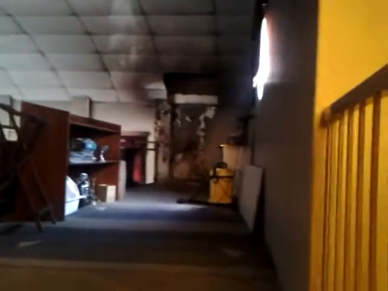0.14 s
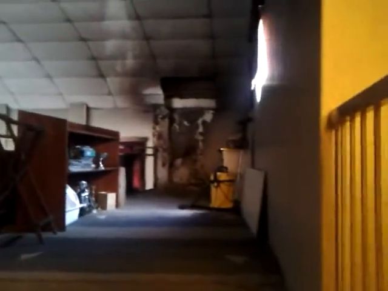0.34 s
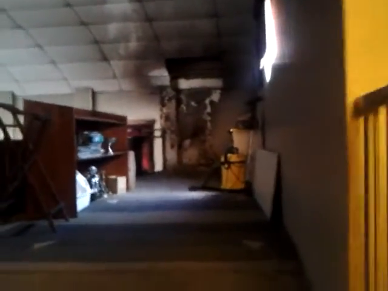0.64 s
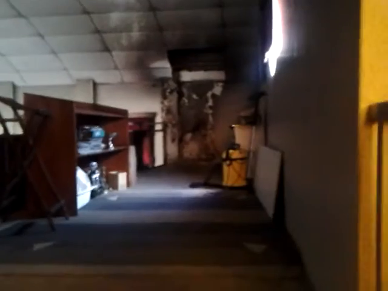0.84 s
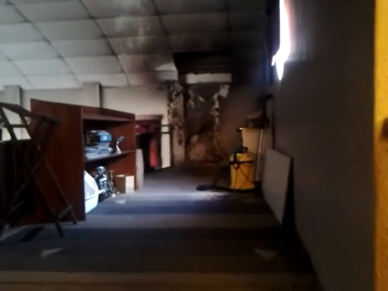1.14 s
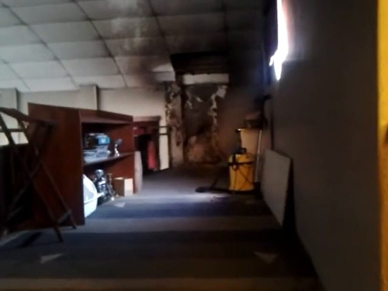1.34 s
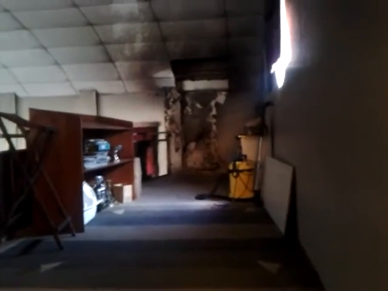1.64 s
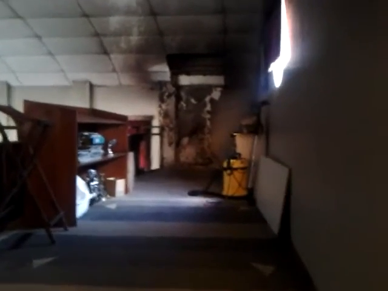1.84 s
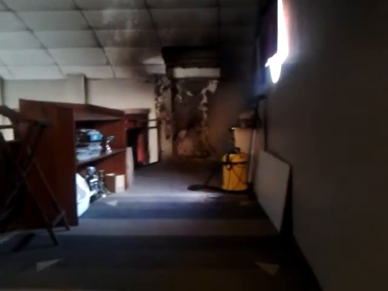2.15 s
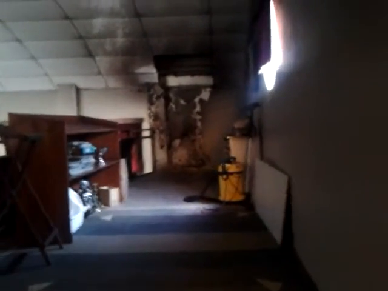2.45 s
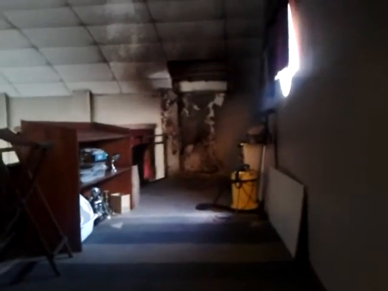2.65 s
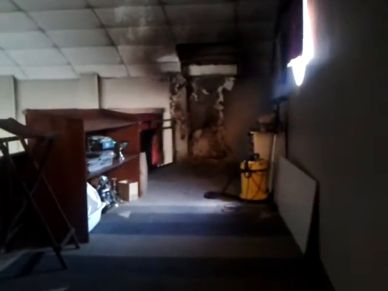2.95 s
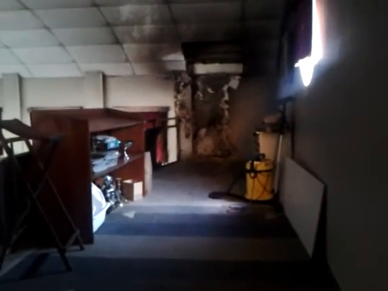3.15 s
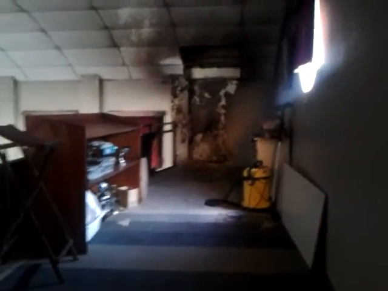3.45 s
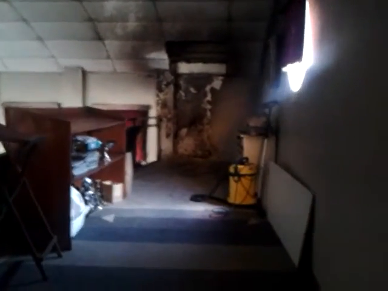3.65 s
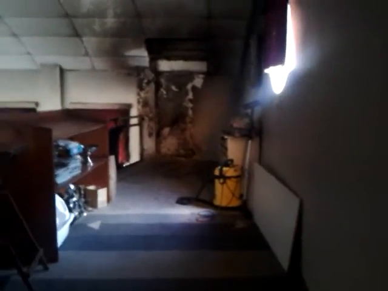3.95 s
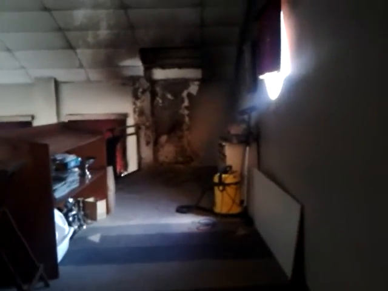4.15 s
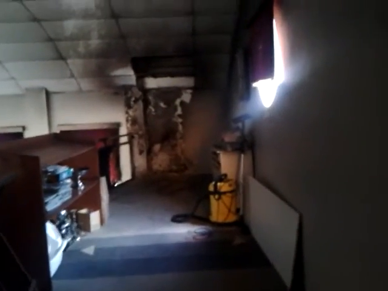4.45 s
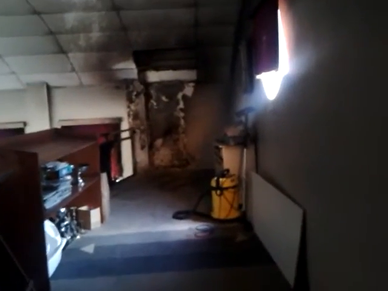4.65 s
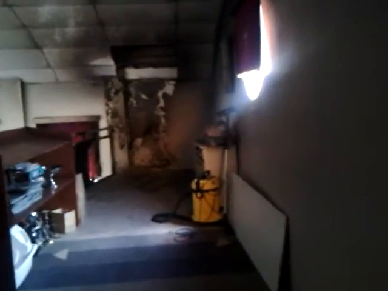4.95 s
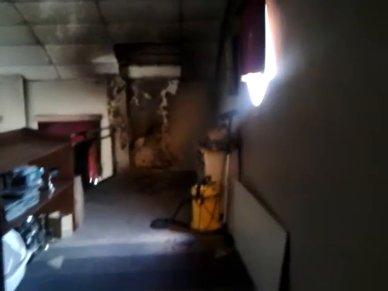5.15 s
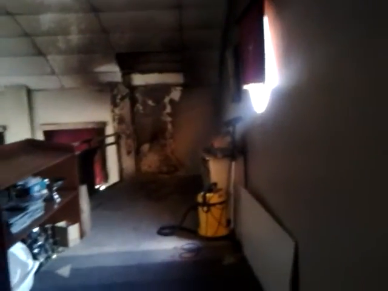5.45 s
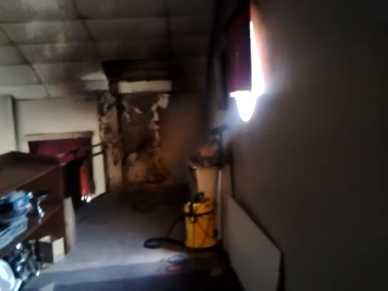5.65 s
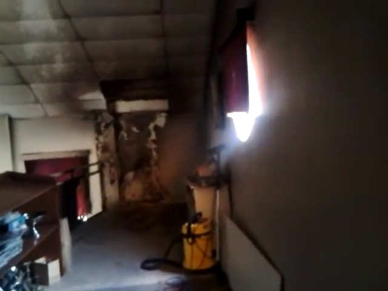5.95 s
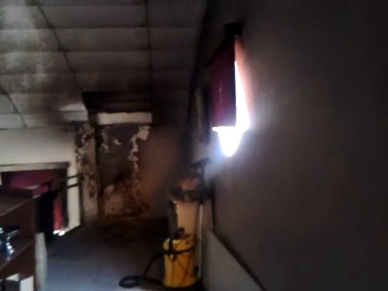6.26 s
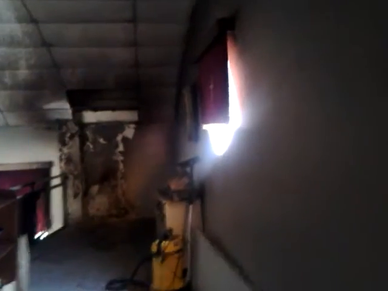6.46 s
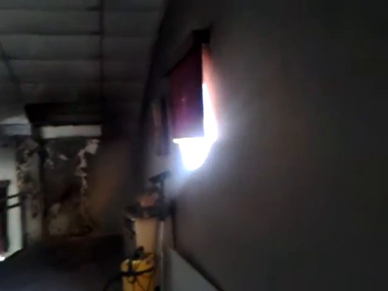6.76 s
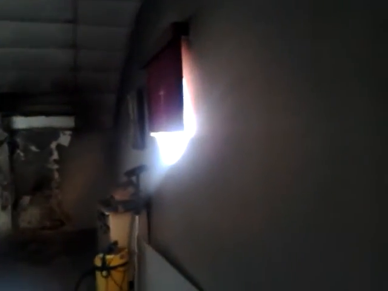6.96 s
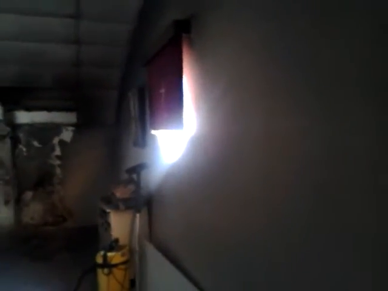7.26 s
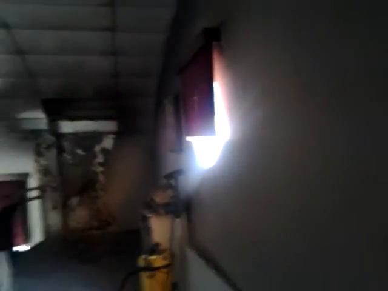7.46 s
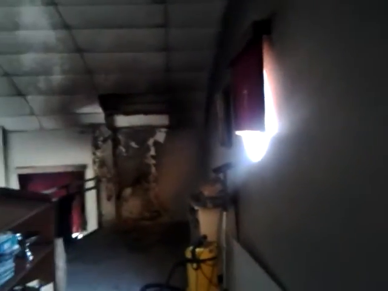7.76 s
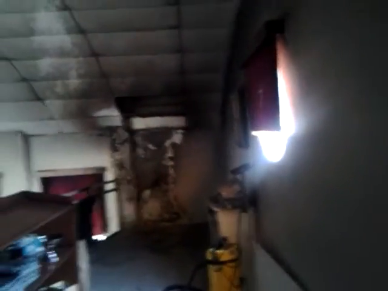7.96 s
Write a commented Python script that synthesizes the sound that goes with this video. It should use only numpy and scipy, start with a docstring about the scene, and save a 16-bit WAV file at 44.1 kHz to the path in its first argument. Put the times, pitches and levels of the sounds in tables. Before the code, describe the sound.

Someone slowly climbs wooden stairs in an echoing room, each step knocking and ringing, while soles scuff and clothing rustles softly.

```python
"""Last wooden stairs, quiet hall

Someone slowly climbs the last wooden stairs into a quiet hall, carrying the microphone on a camera.
Footfalls are coloured noise that cracks and fills the hall, with ringing modes of board and staircase.
Soles scuff and creak between steps; clothes rustle as shaped noise, over faint hiss and a far rumble.
A few small ticks of grit follow after the last step. One channel."""
import sys
import numpy as np
from scipy import signal
from scipy.fft import rfft, irfft, next_fast_len
from scipy.io import wavfile
from scipy.ndimage import uniform_filter1d

SR = 44100
rng = np.random.default_rng(int(sys.argv[2]) if len(sys.argv) > 2 else 0)


def log_audio(samples):
    """Write samples as a 16-bit WAV file to the path given in sys.argv[1]."""
    # one column per channel
    frames = np.atleast_2d(samples).T
    # limit to full scale, then quantise
    limited = np.clip(frames, -1, 1)
    pcm = np.round(limited * 32767).astype(np.int16)
    wavfile.write(sys.argv[1], SR, pcm)


N = 357634
TIME = np.arange(N) / SR  # seconds through the whole scene
AGE = np.arange(2 * SR) / SR  # seconds since the onset of one sound

# All levels are those ahead of the microphone.
# Footfalls on the stairs: start_s, level_db, bass_db, treble_db, knock_db, knock_pitch_hz,
# crack_db and staircase_db (both relative to level_db), with swell_s between those two
FOOTFALLS = [(.284, -34, 0, -10, 10, 2100, -4, 0.0017, -20),
             (0.3303, -30.5, -4, 0.5, -4.5, 2100, 6, 0.0011, -28),
             (1.533, -43, -1.5, -8, 4.5, 3760, -8, .007, -26),
             (2.468, -36.5, -7, -0.5, 4, 1600, 4, 0.0038, -15),
             (3.4301, -31, -6, -0.5, 7.5, 3970, 1.5, 0.016, -26),
             (4.396, -26, -12, 8.5, -2, 2600, -3, 0.0045, -12),
             (4.413, -25.5, -8.5, 1.5, 0.5, 2500, -4, 0.0041, -2.5),
             (5.622, -32.5, -6.5, -3, -5, 1950, -8.5, 0.0046, -16),
             (5.6667, -19.5, 0.5, -3.5, 7, 2900, 4.5, 0.0036, 1.5),
             (5.6904, -24.5, -4, -6, 3, 2380, 12.5, 0.0018, -27)]
# Every trodden spot has its own voice: start_s, level_db, drop_db from one pitch to the next,
# then seven columns of pitch_hz
TREAD_VOICES = [(0.2845, -39, 1.5, 1780, 974, 2230, 1900, 780, 445, 2450),
                (0.331, -35, 1.3, 626, 674, 445, 776, 1089, 347, 1271),
                (1.534, -47, 2, 479, 823, 1299, 335, 747, 852, 710),
                (2.469, -37, 1.3, 323, 459, 716, 775, 835, 576, 415),
                (3.432, -37.5, 1.7, 567, 615, 429, 1122, 955, 2080, 1203),
                (4.413, -32, .8, 725, 967, 472, 579, 852, 792, 1157)]
# Modes of the whole staircase: pitch_hz, level_db, t60_s
STAIRCASE_MODES = [(199, -26, 1.4), (267, -16, .9), (420, -2, .85), (451, -8, .85), (494, -5, .8),
                   (592, -6, .9), (790, -12, .7), (834, -10, .65), (942, -10, .75), (1100, -4, .75),
                   (1845, -11, .7), (2062, -12, .7), (2116, -12, .7), (2342, -11, .7), (2757, -12, .6)]
# The handrail hums after a firm step: start_s, pitch_hz, level_db, t60_s
HANDRAIL_HUMS = [(.332, 205, -45, .8), (2.469, 200, -58, .8), (3.432, 200, -62, 1), (4.42, 204.4, -54.5, 4),
                 (4.42, 161, -60, 2)]
# Soles slapping and scuffing: start_s, level_db, body_db, top_db, swell_s
SOLE_SCUFFS = [(0.5862, -43, -3.5, 1, 0.0019), (.6125, -54, 8, 3, 0.0014), (1.41, -67, 17, -14, .022),
               (1.844, -60, 14, -7, 0.003), (2.704, -43, 1.5, 0, 0.0045), (2.7468, -55, 14, -13, 0.00046),
               (3.8258, -35, 0, -15, 0.014), (3.8553, -32.5, 1, -11, 0.0076), (3.873, -36, -6, -10, 0.0035),
               (4.3921, -31, -4.5, -1, .011), (4.9748, -48, 1, -6, 0.0029), (4.9892, -49, -1, 1, .004),
               (6.35, -53.5, -1, -0.5, 0.021), (7.19, -56, -6, 2, .038)]
# Small ticks of grit underfoot: start_s, level_db, brightness_db
GRIT_TICKS = [(6.748, -59, -12), (6.9037, -57.5, -1), (7.154, -66.5, 6), (7.5532, -58.5, -1),
              (7.722, -56, -1.5)]
# Shoe creaks: loudest_s, level_db, half_length_s, strongest_pitch_hz
SHOE_CREAKS = [(1.858, -50.5, 0.0055, 9050), (1.916, -48, 0.015, 9000), (1.94, -50.5, 0.012, 7700),
               (2.007, -46.5, .004, 8500), (2.168, -58, 0.0071, 6300), (3.776, -47.5, 0.0062, 11200),
               (3.794, -50, .006, 8900), (4.838, -55, 0.0023, 7200), (7.635, -58, 0.0025, 8500)]
# Resonances of the shoe: pitch_hz, width_hz, level_db
SHOE_RESONANCES = [(6160, 900, -7.5), (7180, 400, -8), (10400, 540, -3), (13900, 1200, -10)]
# Sleeves and trouser legs sliding past each other: loudest_s, level_db, half_length_s
FABRIC_SWISHES = [(.06, -58.5, 0.11), (2.35, -64, 0.18), (2.67, -57, 0.057), (3, -62.5, 0.073),
                  (3.23, -63.5, 0.088), (4.98, -64.5, 0.057), (5.18, -60.5, 0.12), (5.47, -58.5, .07),
                  (8.06, -64, 0.17)]
# Rustle of heavy folds, mostly louder while walking: time_s, level_db
RUSTLE_LEVEL = [(0, -56), (.6, -60), (1.3, -58.5), (2.3, -62), (3, -59), (3.4, -65), (3.75, -54.5),
                (4.35, -65), (5.1, -59), (5.55, -64), (6.25, -63.5), (6.9, -66), (7.7, -75.5), (8.1, -65.5)]
# The far rumble, swelling in the last two seconds: time_s, level_db
RUMBLE_LEVEL = [(0, -86), (6.2, -82), (6.8, -71), (7.2, -72.5), (7.7, -72.5), (8.1, -78)]
# Spectra of struck wood, sole, heavy folds, sliding fabric, faint hiss and far rumble:
# pitch_hz, density_db (per Hz, relative)
WOOD_SPECTRUM = [(30, -40), (70, -42), (130, -29.5), (245, -14), (320, -7), (430, -3.5), (750, -0.5),
                 (1350, -4), (2200, -2), (3200, -12.5), (4200, -17.5), (8500, -20), (11000, -27),
                 (16000, -33.5)]
SOLE_SPECTRUM = [(60, -32), (250, -15), (600, -3.5), (1200, 0), (2200, 6), (3600, 0.5), (6500, 0),
                 (9500, 2.5), (12000, -5), (16000, -5)]
FOLD_SPECTRUM = [(60, -18.5), (250, -3.5), (700, 4), (1400, 3.5), (2200, 5), (3300, -3.5), (5500, -9),
                 (9000, -6), (16000, -5.5)]
SWISH_SPECTRUM = [(2000, -11.5), (6000, -8), (7200, -7), (8100, -2), (9000, -3.5), (11000, -17),
                  (16000, -14.5)]
AIR_SPECTRUM = [(25, -27.5), (50, -20.5), (100, -12), (230, 1.5), (400, 2), (650, -5), (1500, -7),
                (2200, -8.5), (3300, -10.5), (6000, -13), (8500, -21.5), (12000, -9), (16000, -7.5)]
RUMBLE_SPECTRUM = [(25, -16.5), (60, -12), (100, 2.5), (180, 0), (400, -14), (1000, -38.5), (4000, -69)]
# The hall by frequency band: centre_hz, t60_s, build_up_s
HALL_BANDS = [(120.1, 2.3, 0.071), (400, 1.23, 0.0047), (940, 0.91, 0.0045), (2250, 0.75, 0.00099),
              (4500, 0.64, .001), (8500, 0.53, .001), (15100, .38, .001)]

# The harder the blow, the shorter the contact: contact time at a reference level, and exponent
CONTACT_S, CONTACT_AT_DB, CONTACT_SHORTENING = 0.0026, -29, 0.81
# Corners of the tone of a blow; its top follows the treble
BASS_HZ, BODY_HZ, TREBLE_HZ, TOP_HZ = 300, 1000, 7500, 12500
TOP_DB, TOP_FOLLOWS = 1, 1.3
KNOCK_OCTAVES = 0.56  # spread of the band in which the heel knocks, or is muffled
# Low pitches of a board ring longer: t60 at a reference pitch, and exponent
TREAD_T60_S, TREAD_AT_HZ, TREAD_DAMPING = 0.8, 553, 0.12
SLAP_DB, SLAP_LOSS_DB_PER_S = 14.5, 1300  # a quick slap cracks, a slow scuff does not
SLIDE_DB = -12.5  # faint sliding that goes with any rustle
EDGE_HZ = 15850  # upper band limit of the microphone channel


def footfalls():
    """Each blow of the shoe has its own tone and shakes the staircase; harder blows crack more briefly."""
    out = np.zeros(N)
    for s, db, bass, treble, knock, knock_hz, crack, swell, shake in FOOTFALLS:
        tone = shoe_tone(bass, treble, knock, knock_hz)
        contact_s = CONTACT_S * amp(CONTACT_AT_DB - db) ** CONTACT_SHORTENING
        impact = blow(WOOD_SPECTRUM, tone, crack, swell, crack_s=contact_s, patchy_db=3.0)
        staircase = sum(ring(hz, mode_db + shake, t60) for hz, mode_db, t60 in STAIRCASE_MODES)
        add(out, s, amp(db) * (impact + staircase))
    return out


def treads():
    """The trodden board rings at its own pitches; a firm step sets the handrail humming."""
    out = np.zeros(N)
    for s, db, drop, *pitches in TREAD_VOICES:
        for k, hz in enumerate(pitches):
            t60 = TREAD_T60_S * (TREAD_AT_HZ / hz) ** TREAD_DAMPING
            add(out, s, ring(hz, db - k * drop, t60))
    for s, *hum in HANDRAIL_HUMS:
        add(out, s, ring(*hum))
    return out


def scuffs():
    """Bright slaps and slower scuffs of the sole in the hall, and tiny dry ticks of grit."""
    out = np.zeros(N)
    for s, db, body, top, swell in SOLE_SCUFFS:
        tone = [(2200, body), (4500, 0), (8500, 0), (12500, top)]
        crack = SLAP_DB - SLAP_LOSS_DB_PER_S * swell
        add(out, s, amp(db) * blow(SOLE_SPECTRUM, tone, crack, swell, crack_s=0.00083, patchy_db=3.0))
    for s, db, bright in GRIT_TICKS:
        grit = colour(noise(SOLE_SPECTRUM, len(AGE)), [(2000, -bright), (7000, bright)])
        decay = fade(t60=0.0085) + amp(-12.5) * fade(t60=0.34)
        add(out, s, amp(db) * grit * decay)
    return out


def creaks(slips_per_s=900, squeal_width_hz=600, rub_db=-15, wet_db=-3):
    """Rubbing noise, roughened by random quick slips, excites narrow resonances of the shoe."""
    out = np.zeros(N)
    hz = np.fft.rfftfreq(len(AGE), 1 / SR)
    for s, db, half, pitch in SHOE_CREAKS:
        slipping = rng.random(len(AGE)) < slips_per_s / SR
        friction = rng.standard_normal(len(AGE)) * (0.73 + slipping)
        modes = [*SHOE_RESONANCES, (pitch, squeal_width_hz, 0)]
        body = sum(amp(d) / (1 + 2j * (hz - f) / w) for f, w, d in modes)
        rub = amp(rub_db) * hz / (hz + 4000)
        squeal = unit(irfft(rfft(friction) * (body + rub)))
        envelope = np.exp(-(AGE / half - 2) ** 2)  # loudest two half lengths after its onset
        add(out, s - 2 * half, amp(db) * squeal * envelope)
    tail = hall(rng.standard_normal(len(AGE)), swell=0.0063)
    echoes = signal.fftconvolve(out, tail / np.linalg.norm(tail))[:N]
    return out + amp(wet_db) * echoes


def clothes(flutter_db=0.68):
    """Folds rustle unevenly as the body moves; each swish of smooth fabric swells and fades."""
    rustle = amp(np.interp(TIME, *np.transpose(RUSTLE_LEVEL)))
    strokes = sum(amp(db) * np.exp(-.5 * ((TIME - s) / half) ** 2) for s, db, half in FABRIC_SWISHES)
    flutter = amp(flutter_db * unit(uniform_filter1d(rng.standard_normal(N), size=900)))
    folds = noise(FOLD_SPECTRUM, N) * rustle
    swish = noise(SWISH_SPECTRUM, N) * np.hypot(strokes, amp(SLIDE_DB) * rustle)
    return (folds + swish) * flutter


def background(air_db=-64):
    """Steady faint hiss, and a far rumble that swells near the end, both coloured noise."""
    hiss = amp(air_db) * noise(AIR_SPECTRUM, N)
    rumble = noise(RUMBLE_SPECTRUM, N) * amp(np.interp(TIME, *np.transpose(RUMBLE_LEVEL)))
    return hiss + rumble


def blow(spectrum, tone, crack_db, swell, crack_s, patchy_db, ripple_db=7.0, lowest_hz=130):
    """A short direct crack, then reflections that are patchy at first and soon merge."""
    patches = unit(uniform_filter1d(rng.standard_normal(len(AGE)), size=50))
    clumps = amp(patchy_db * patches * np.exp(-AGE / 0.076))
    voice = colour(colour(noise(spectrum, len(AGE)), tone), ripple(ripple_db))
    echoes = hall(voice, swell) * clumps
    # reversed: the crack has the colour of its echoes but not their waveform
    direct = voice[::-1] * np.exp(1 - AGE / crack_s) * AGE / crack_s
    # boards and soles are too small to radiate deep bass
    highpass = signal.butter(4, lowest_hz, "high", fs=SR, output="sos")
    return signal.sosfilt(highpass, echoes + amp(crack_db) * direct)


def shoe_tone(bass_db, treble_db, knock_db, knock_hz):
    """The colour of one blow, dull or bright, with the heel's knock as a hump or hollow: (Hz, dB)."""
    hz = np.geomspace(100, 16000, num=60)
    top_db = TOP_DB + TOP_FOLLOWS * treble_db
    slope = [(BASS_HZ, bass_db), (BODY_HZ, 0), (TREBLE_HZ, treble_db), (TOP_HZ, top_db)]
    knock = knock_db * np.exp(-.5 * (np.log2(hz / knock_hz) / KNOCK_OCTAVES) ** 2)
    return np.c_[hz, read(slope, hz) + knock]


def ripple(depth_db):
    """Crowded small resonances that differ from one blow to the next, of mean power 1: (Hz, dB)."""
    hz = np.geomspace(300, 16000, num=160)
    db = rng.uniform(-depth_db, depth_db, len(hz))
    return np.c_[hz, db - 10 * np.log10(np.mean(amp(db) ** 2))]


def ring(hz, db, t60, swell=0.015):
    """One mode that builds up and dies away, a sine of random phase."""
    envelope = fade(t60) * (1 - np.exp(-AGE / swell))
    return amp(db) * envelope * np.sin(2 * np.pi * (hz * AGE + rng.random()))


def hall(x, swell):
    """Lets a steady sound build up and die away in the hall, the bass more slowly than the treble."""
    hz, spectrum = np.fft.rfftfreq(len(x), 1 / SR), rfft(x)
    centres, t60s, rises = np.transpose(HALL_BANDS)
    out = np.zeros(len(x))
    for row, t60, rise in zip(np.eye(len(HALL_BANDS)), t60s, rises):
        share = read(np.c_[centres, row], hz)  # overlapping bands that add up to the whole
        out += irfft(spectrum * share) * fade(t60) * (1 - np.exp(-AGE / (swell + rise)))
    return out


def fade(t60):
    """Exponential decay by 60 dB in t60 seconds."""
    return np.exp(-np.log(1000) * AGE / t60)


def noise(points, size):
    """Noise of rms 1 with the given spectrum."""
    return unit(colour(rng.standard_normal(size), points))


def colour(x, points):
    """Filters x by a table of (Hz, dB)."""
    size = next_fast_len(len(x))
    gain = amp(read(points, np.fft.rfftfreq(size, 1 / SR)))
    return irfft(rfft(x, size) * gain, size)[:len(x)]


def read(points, hz):
    """A table joined by straight lines over log frequency."""
    f, value = np.transpose(points)
    return np.interp(np.log(hz + 1), np.log(f), value)


def add(mix, s, sound):
    """Mixes a sound in at time s."""
    part = mix[max(round(s * SR), 0):][:len(sound)]
    part += sound[:len(part)]


def amp(db):
    """Amplitude factor of a level in dB."""
    return 10 ** (np.asarray(db) / 20)


def unit(x):
    """Scales x to rms 1."""
    return x / np.sqrt(np.mean(x ** 2) + 1e-20)


def scene():
    """Everything at the hand-held camera's microphone, one channel."""
    return (footfalls() + treads() + scuffs() + creaks() + clothes() + background())[None]


def record(dry, port_hz=8450, port_q=6, port_db=8):
    """The microphone port adds a treble resonance to the sound; then the band limit."""
    resonance = signal.lfilter(*signal.iirpeak(port_hz, port_q, fs=SR), dry)
    heard = dry + amp(port_db) * resonance
    lowpass = signal.firwin(511, EDGE_HZ, window=("kaiser", 9), fs=SR)
    return signal.oaconvolve(heard, lowpass[None], "same")


dry = scene()
out = record(dry)
log_audio(out)
```